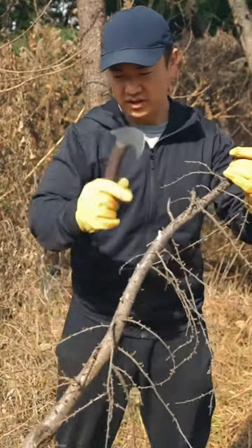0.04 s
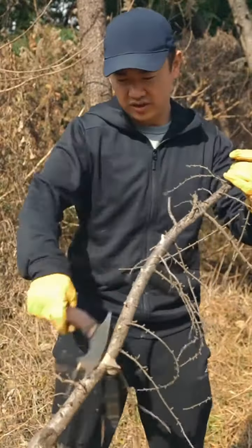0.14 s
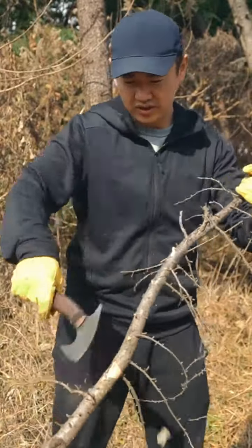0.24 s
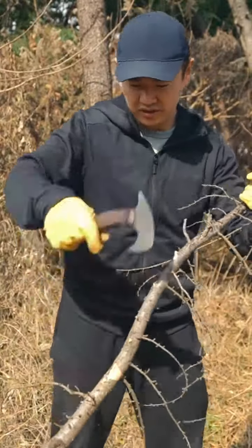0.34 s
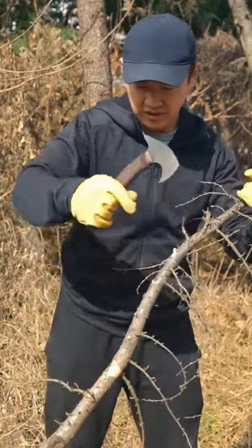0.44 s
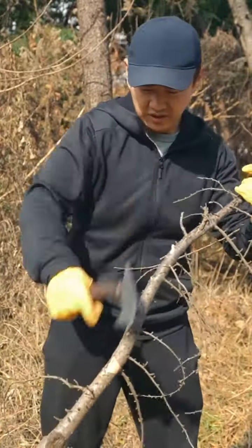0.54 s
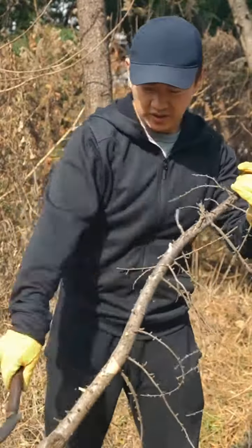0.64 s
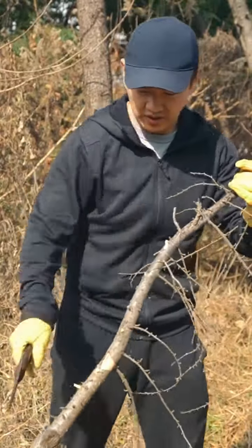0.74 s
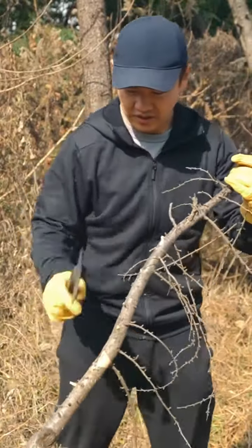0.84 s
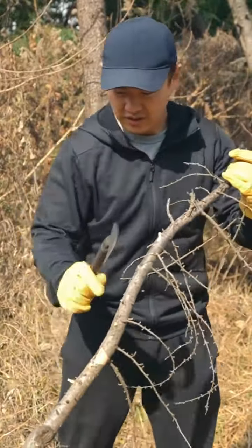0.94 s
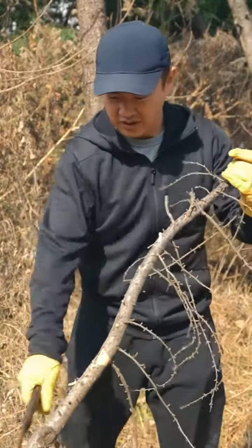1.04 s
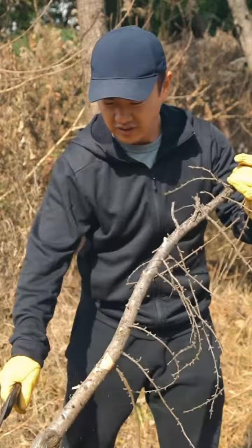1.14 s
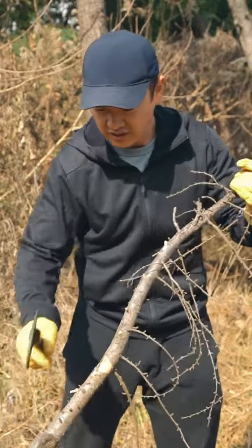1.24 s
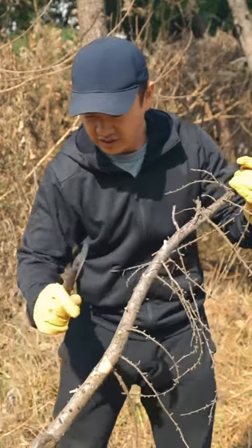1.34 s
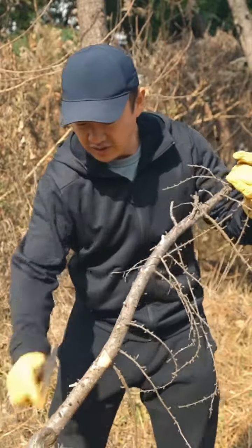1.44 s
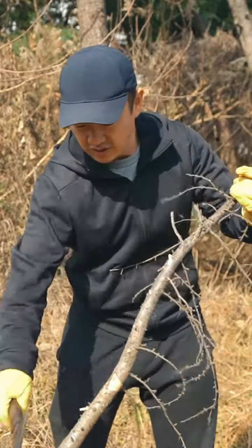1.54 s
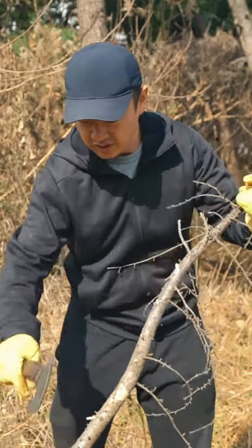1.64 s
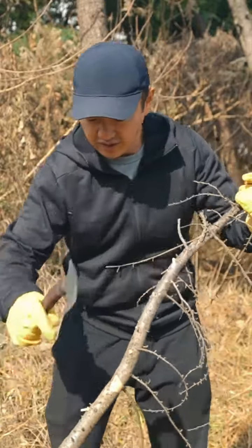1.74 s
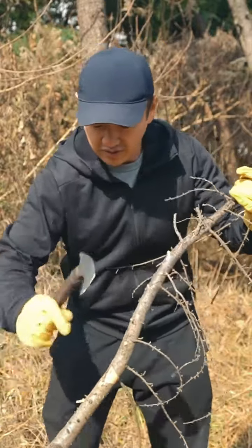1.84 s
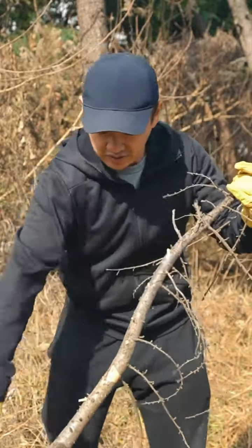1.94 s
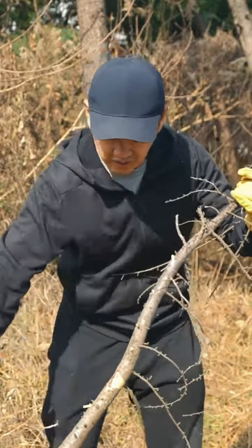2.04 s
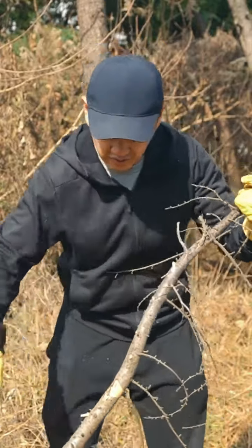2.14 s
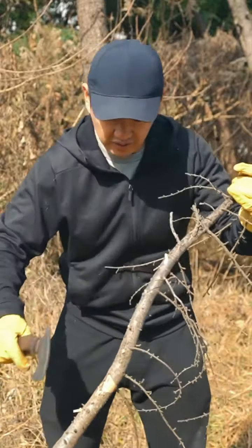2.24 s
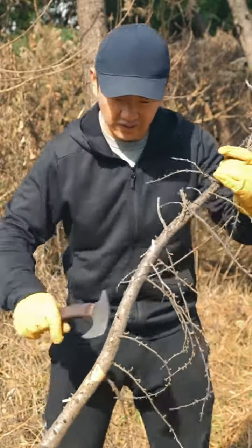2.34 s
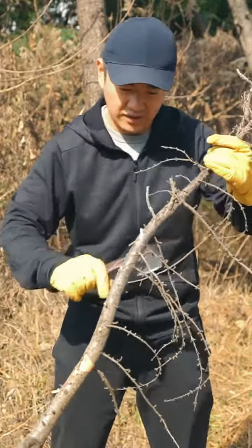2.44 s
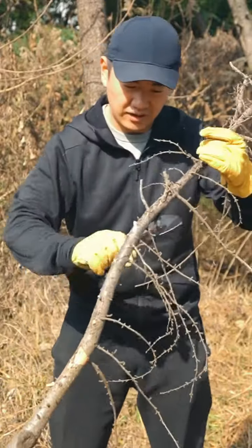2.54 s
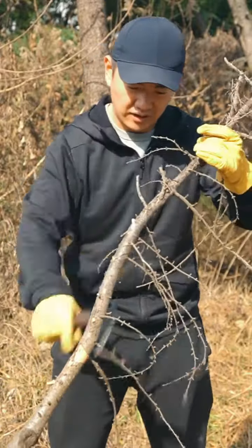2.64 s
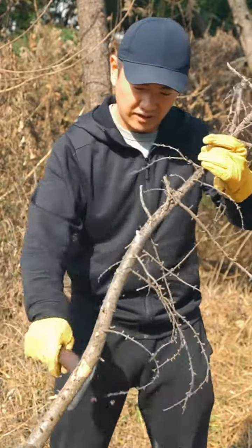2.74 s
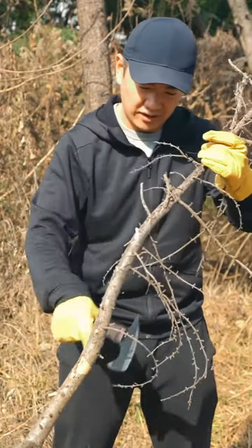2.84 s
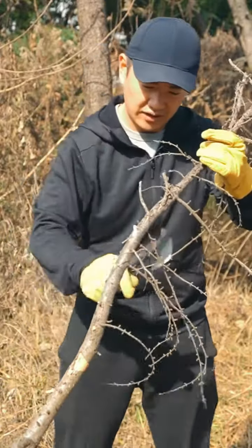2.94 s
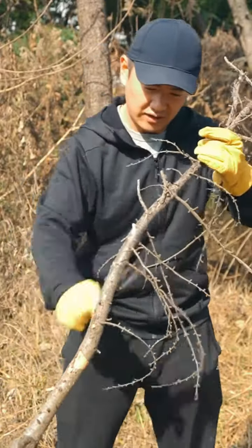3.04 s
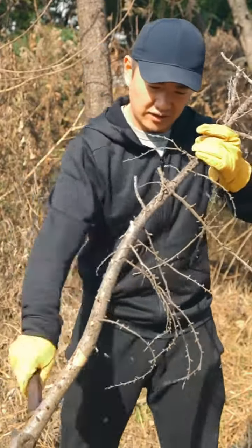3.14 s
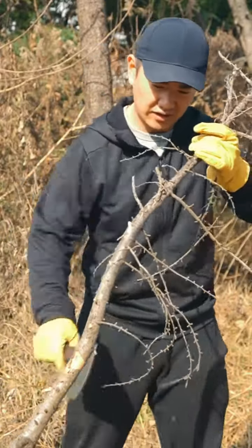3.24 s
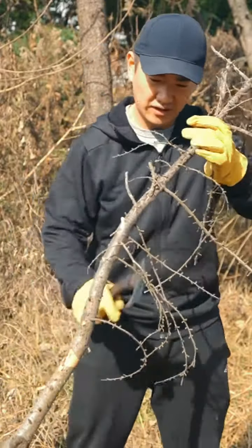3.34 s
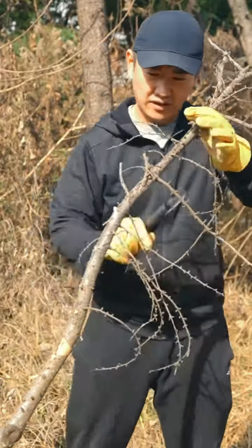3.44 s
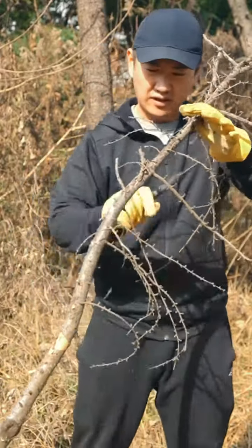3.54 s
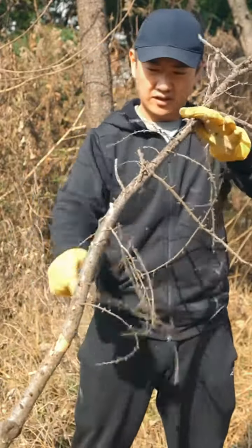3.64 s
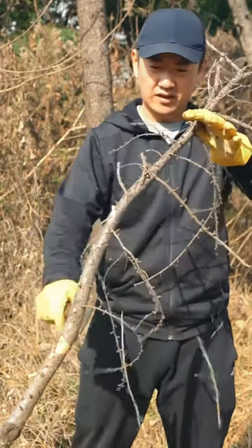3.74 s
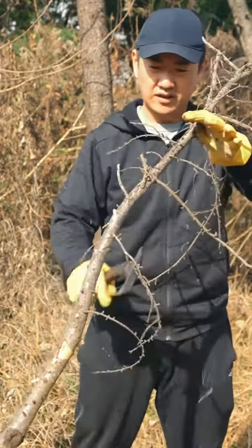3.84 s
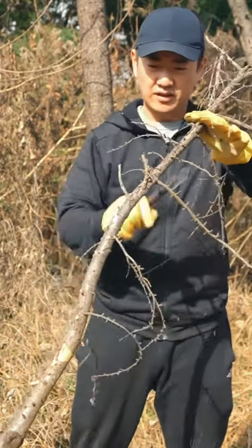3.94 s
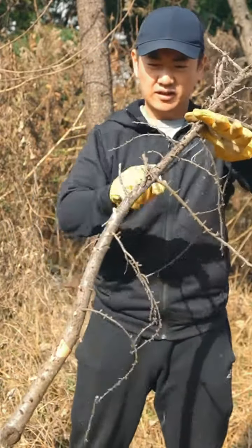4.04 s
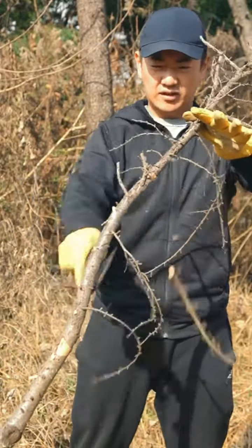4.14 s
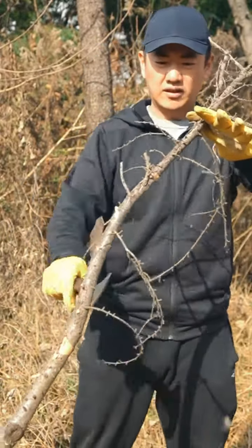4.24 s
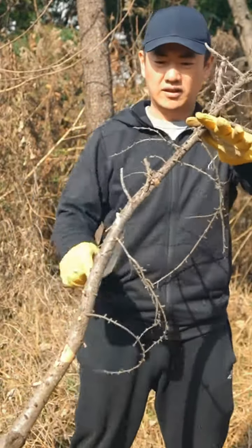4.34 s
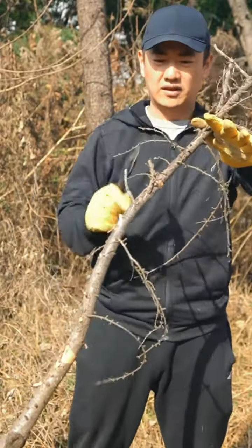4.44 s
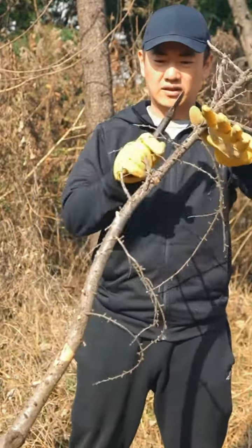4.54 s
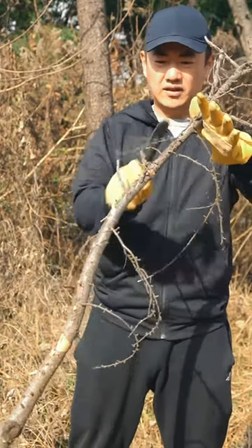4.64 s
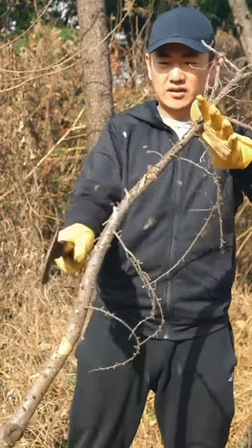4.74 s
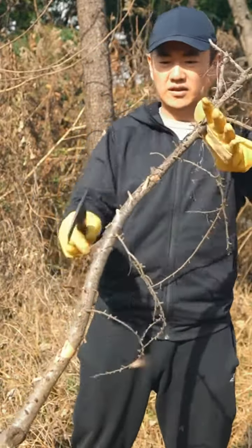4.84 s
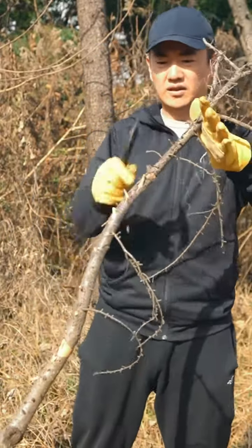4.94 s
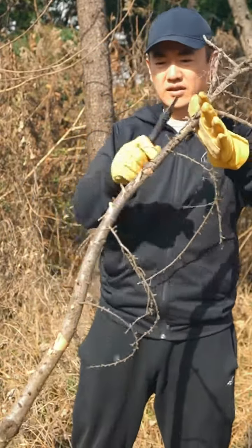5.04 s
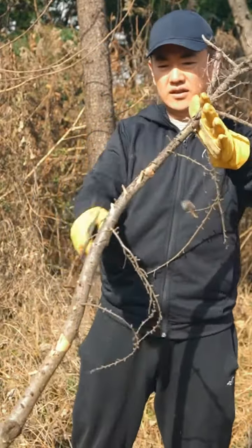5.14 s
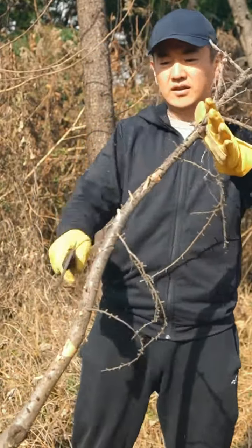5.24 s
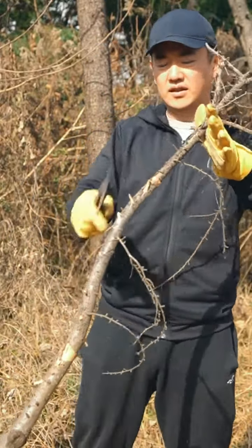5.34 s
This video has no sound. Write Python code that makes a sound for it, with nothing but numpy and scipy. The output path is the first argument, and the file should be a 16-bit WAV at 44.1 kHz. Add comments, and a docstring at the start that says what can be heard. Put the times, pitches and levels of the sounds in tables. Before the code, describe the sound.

A hand axe chops dry twigs off a branch with sharp, brittle cracks about twice a second, over a low outdoor rumble.

```python
"""Outdoors, close to the microphone, a hand axe strips dry twigs off a long branch in eleven strokes.
Each contact is a brittle fracture: the fibres fail as a burst of impulses that excites the modes of
the wood, while the impact rings the steel head. Twigs tick and swish between strokes, and ground and
trees scatter a short tail. Behind lie a far engine drone, a low rumble and distant traffic.
The loudest cracks saturate the microphone."""
import sys
import numpy as np
from scipy import signal
from scipy.fft import rfft, irfft, next_fast_len
from scipy.io import wavfile
from scipy.ndimage import uniform_filter1d

SR = 44100
rng = np.random.default_rng(int(sys.argv[2]) if len(sys.argv) > 2 else 0)


def dump(signal):
    """Clip the signal to [-1, 1] and save it as 16-bit WAV at the path in sys.argv[1]."""
    limited = np.clip(np.atleast_2d(signal).T, -1, 1)
    pcm = np.round(limited * 32767).astype(np.int16)
    wavfile.write(sys.argv[1], SR, pcm)


N = 238443
TIME, HIT_TIME = np.arange(N) / SR, np.arange(12000) / SR

# Clean breaks: t/s, levels/dB (knock, crack, splinters, steel), stem f/Hz, twig f/Hz, nominal T60/s
BREAKS = [(0.0753, -18.5, -15.5, -18, -19.5, 594, 3100, 0.021),
          (0.0824, -19, -11, -16, -30, 1150, 4760, 0.05), (0.0976, -20, -26, -19.5, -24, 940, 2450, 0.094),
          (0.1266, -26.5, -23.5, -28, -33, 735, 4570, 0.028),
          (0.5295, -12, -20, -29, -39, 1470, 2180, 0.015),
          (0.5337, -12.5, -19, -16.5, -23, 1360, 3620, 0.02),
          (0.972, -9.5, -13, -18.5, -40, 1124, 2860, 0.03),
          (1.4232, -12.5, -11, -12, -27, 1050, 4060, 0.018),
          (1.477, -16, -13.5, -12.5, -38, 1750, 3370, 0.0056),
          (1.875, -16.5, -14, -11.5, -23, 1240, 2010, .024), (2.613, -16, -17, -24, -24, 1380, 4620, 0.033),
          (3.028, -13, -22.5, -29, -47, 716, 3000, 0.037), (3.0338, -18.5, -26, -27, -32, 690, 3220, 0.027),
          (3.5824, -11.5, -14.5, -17, -20.5, 1220, 2260, 0.14),
          (4.0548, -12, -21, -15.5, -23.5, 1660, 2130, 0.026),
          (4.6235, -16.5, -18.5, -15, -45, 1280, 2370, 0.067),
          (4.632, -41, -17.5, -13, -23, 1330, 3350, 0.033), (4.71, -24, -20.5, -22, -30, 1380, 2200, 0.084),
          (5.0659, -17, -16, -16, -37, 1010, 2300, 0.043)]
# Twigs tearing off: t/s, knock level/dB, crack level/dB, stem f/Hz, twig f/Hz
TEARS = [(0.0936, -18, -24, 714, 3990), (0.11, -17.5, -28, 1280, 4050), (0.9829, -15.5, -21.5, 720, 2320),
         (1.4496, -16, -24, 1180, 2200), (1.469, -20, -16, 1410, 2250), (1.49, -25, -23, 1300, 4060),
         (1.8856, -21, -20, 1600, 2830), (1.893, -20, -20.5, 1160, 3930), (1.912, -32, -20, 1410, 3620),
         (2.6029, -13, -11.5, 1310, 2410), (2.618, -18.5, -27, 460, 2170), (2.6487, -26.5, -22, 1200, 4170),
         (3.0117, -23.5, -26.5, 800, 3150), (3.05, -20.5, -33, 607, 2240), (3.558, -16, -20, 680, 2136),
         (3.594, -12, -19.5, 870, 2960), (3.613, -18, -20, 567, 2180), (4.0675, -25, -26, 540, 3200),
         (4.0987, -15.5, -17, 1100, 2470), (4.613, -35, -16, 1790, 2900), (4.7395, -29, -25.5, 1730, 1978),
         (5.0836, -25, -34, 670, 3820)]
def axe():
    """Fracture: every contact knocks, cracks and rings the head; tearing twigs splinter more faintly."""
    out = np.zeros(N)
    for t, *blow in BREAKS:
        add(out, t, contact(*blow, sudden=0.91))
    for t, knock_db, crack_db, stem_hz, twig_hz in TEARS:
        splinter_db, steel_db = crack_db - 11.5, crack_db - 11
        tear = contact(knock_db, crack_db, splinter_db, steel_db, stem_hz, twig_hz, 0.079, sudden=0.74)
        add(out, t, tear)
    return out

def contact(knock_db, crack_db, splinter_db, steel_db, stem_hz, twig_hz, t60, sudden):
    """Superposition: four sounds start together, each with its own energy."""
    return (burst(knock(stem_hz, t60, sudden), knock_db)
            + burst(crack(twig_hz, t60, sudden), crack_db)
            + burst(splinters(t60, sudden), splinter_db)
            + burst(steel_ring(), steel_db))

# Force spectrum: f/centre frequency, relative level/dB
FORCE_SPECTRUM = [(.055, -51.5), (.16, -11), (.3, -7), (.6, 1), (1.1, -2), (1.8, -1), (3.2, -40.5),
                  (11, -62)]
# Branch modes: f/Hz, relative level/dB, T60/s
BRANCH_MODES = [(510, -12, 0.043), (529, 2.5, 0.11), (660, 18.5, 0.01), (872, 7, 0.07), (1030, 8, 0.023),
                (1326, -11.5, 0.023), (1270, 18, 0.029), (1606, 2, 0.12)]
def knock(stem_hz, t60, sudden):
    """Forced vibration: the blow drives branch and side stem; thicker wood knocks lower."""
    centre_hz = 1110 * (stem_hz / 1000) ** 0.47
    spectrum = [(ratio * centre_hz, db) for ratio, db in FORCE_SPECTRUM]
    force = colour(fracture(1.3 * t60, first=0.48 * sudden), spectrum)
    branch = ring(force, BRANCH_MODES, detune=0.0045)
    stem = resonate(force, stem_hz, q=10)
    return burst(force, 0) + burst(branch, -6) + burst(stem, -4)

# Crack spectrum: f/Hz, relative level/dB
CRACK_SPECTRUM = [(700, -33), (1500, 5.5), (2100, 2.5), (3000, 4.5), (4200, -0.5), (5500, -7), (8000, -54)]
def crack(twig_hz, t60, sudden):
    """Resonance: tearing fibres excite the twig at its natural frequency."""
    tear = colour(fracture(0.91 * t60, first=0.21 * sudden), CRACK_SPECTRUM)
    return burst(tear, 0) + burst(resonate(tear, twig_hz, q=10), -3)

# Splinter spectrum: f/Hz, relative level/dB
SPLINTER_SPECTRUM = [(3500, -20), (5300, 3), (6200, 6), (7600, 11.5), (9500, 6), (12000, 7), (15500, 5)]
def splinters(t60, sudden):
    """Acoustic emission: tiny fractures of very unequal size fill the treble."""
    fibres = fracture(0.83 * t60, first=0.55 * sudden, rate=6300, spread_db=7.5)
    return colour(fibres, SPLINTER_SPECTRUM)

# Axe head modes: f/Hz, relative level/dB, T60/s
STEEL_MODES = [(2770, 6, 0.075), (4050, -3.5, 0.066), (4780, 3, 0.096), (7220, 5.5, 0.079),
               (7400, -5, 0.082), (8000, 5, 0.039), (8700, -26, .045), (10960, 6.5, 0.035),
               (13200, -25, .04)]
def steel_ring():
    """Free vibration: the head is struck once, as the edge bites."""
    return ring(signal.unit_impulse(len(HIT_TIME)), STEEL_MODES, detune=0.006)

def fracture(t60, first, rate=7000, spread_db=-0.5):
    """Stress release: one impulse of weight `first`, then a dying run of failing fibres."""
    fibres = clicks(len(HIT_TIME), rate, spread_db) * fade(t60)
    fibres /= np.sqrt(np.sum(fibres ** 2))
    fibres[0] -= first
    return fibres

# Twig ticks: t/s, relative level/dB, f/Hz, ring level/dB re the snap
TICKS = [(0.034, -29.5, 7140, 0), (0.2147, -30.5, 4660, -11), (0.4753, -14.5, 3940, 28),
         (0.7778, -25, 2300, 0), (0.8763, -22, 3940, -1), (1.189, -23.5, 6200, -1),
         (1.2548, -21.5, 5300, -5), (1.814, -18, 4230, 1), (2.0246, -22, 3380, -3),
         (2.15, -13.5, 3830, -11), (2.288, -23, 5000, 2), (2.2938, -24, 5000, -8), (2.5744, -18.5, 2296, 3),
         (2.717, -21, 2014, 0), (2.812, -27, 2260, 9), (2.9104, -19, 14000, 2), (2.9934, -21, 3340, -3),
         (3.2236, -25, 4150, -3), (3.247, -23, 5100, -3), (3.6638, -18, 4700, 6), (3.685, -10.5, 3240, -8),
         (3.9632, -23.5, 13160, 3), (4.567, -28, 5320, 4), (4.6032, -11, 4750, 6), (4.78, -14, 9050, 9),
         (4.929, -22.5, 5070, -1), (5.059, -21, 7500, 4), (5.0894, -16, 7350, 0), (5.248, -23, 5330, 5)]
# Snap spectrum: f/Hz, relative level/dB
SNAP_SPECTRUM = [(800, -15), (2000, 0.5), (3500, 3.5), (5200, 1), (6500, -1), (9000, 2.5), (12000, 2),
                 (15500, -11)]
def twigs():
    """Damped resonance: each thin twig snaps and rings briefly at its own pitch."""
    out = np.zeros(N)
    for t, db, hz, ring_db in TICKS:
        snap = colour(fracture(t60=0.016, first=0.34), SNAP_SPECTRUM)
        tick = burst(snap, 0) + burst(resonate(snap, hz, q=5), ring_db)
        add(out, t, burst(tick, db - 12))
    return out

# Sweeps of twigs and sleeves: peak t/s, level/dB, release time constant/s
SWISHES = [(.31, -43.5, 0.11), (.91, -40, 0.023), (1.22, -41.5, 0.018), (1.5, -21, 0.025),
           (1.72, -39.5, 0.036), (2.02, -37.5, .08), (2.12, -38.5, 0.097), (2.39, -41.5, 0.046),
           (2.654, -26, .025), (2.77, -44, .06), (2.871, -43, .03), (2.91, -32.5, 0.035), (3.005, -32, .03),
           (3.24, -34, 0.032), (3.42, -50.5, 0.17), (3.71, -39, 0.14), (3.83, -36, 0.041),
           (3.939, -38.5, 0.079), (4.2, -44, 0.13), (4.346, -29, 0.067), (4.652, -29, 0.03),
           (4.796, -24.5, 0.062), (4.969, -36.5, 0.099), (5.24, -37.5, 0.052)]
def sliding_db():
    """Incoherent sources add in power: steady handling, swishes and a shiver after each break."""
    power = undb(-46.5 + 0.9 * walk(8.7)) ** 2
    for t, db, release_s in SWISHES:
        power += swell(t, db, release_s) ** 2
    for t, _, crack_db, *_ in BREAKS:
        power += swell(t + 0.066, crack_db - 26.5, release_s=0.04) ** 2
    return 10 * np.log10(power)

def swell(peak_s, db, release_s):
    """Exponential growth and decay; louder sweeps rise more abruptly."""
    attack_s = 0.041 * 2 ** np.clip(-(db + 35) / 6, -1, 1)
    return undb(db) * np.exp(-np.maximum((peak_s - TIME) / attack_s, (TIME - peak_s) / release_s))

# Friction spectrum: f/Hz, relative level/dB
FRICTION_SPECTRUM = [(500, -7), (1500, 9), (2500, 4.5), (3800, 4.5), (5200, 5), (6300, 0.5), (8300, 6.5),
                     (11000, 0), (13500, 7), (16000, -1.5)]
def brushing():
    """Friction noise: stems and cloth hiss and crackle, brighter as they slide more briskly."""
    level_db = sliding_db()
    crackle = sum(unit(resonate(clicks(N, rate=70, spread_db=5.5), hz, q=3))
                  for hz in np.geomspace(3500, 13000, 6))
    friction = colour(rng.standard_normal(N) + undb(-6) * unit(crackle), FRICTION_SPECTRUM)
    treble = signal.lfilter(*signal.butter(1, 5000, "high", fs=SR), friction)
    friction += treble * (undb(0.19 * (level_db + 30)) - 1)
    return unit(friction) * undb(level_db + 3 * walk(70))

def scatter(x, wet_db=-16, onset_s=0.0079):
    """Diffuse reflection: ground and trees return a thin, short tail."""
    onset = np.minimum(HIT_TIME / onset_s, 1) ** 2
    tail = rng.standard_normal(len(HIT_TIME)) * fade(t60=0.42) * onset
    tail = colour(tail, [(150, 9), (800, -2), (3000, 1.5), (8000, 3), (15000, 0)])
    return undb(wet_db) * signal.fftconvolve(x, tail / np.sqrt(np.sum(tail ** 2)))[:N]

# Grass spectrum: f/Hz, relative level/dB
GRASS_SPECTRUM = [(1000, 5), (2500, 4.5), (5200, 3.5), (6300, -25), (8300, -35), (11000, 1), (13500, -17),
                  (16000, -4.5)]
def grass():
    """Stationary noise: the dry grass never falls quite silent."""
    return noise(GRASS_SPECTRUM) * undb(-51)

# Engine firing rate: t/s, f/Hz
FIRING_RATE = [(0.0, 82), (0.04, 79.95), (0.98, 84.5), (1.32, 72.3), (1.57, 73.24), (1.99, 65.2),
               (2.15, 64.8), (3.74, 69.0), (4.23, 66.9), (4.34, 63.1), (4.83, 74), (5.41, 71.4)]
# Engine envelope: t/s, relative level/dB
ENGINE_LEVEL = [(0, -56), (.2, -46), (.33, -27.5), (.5, -45), (.65, -29.5), (1.0, -42), (1.35, -42.5),
                (1.93, -36.5), (2.1, -28.5), (2.41, -32), (2.52, -26), (2.7, -32.5), (2.88, -38),
                (3.05, -30), (3.33, -26.5), (3.46, -39), (3.79, -26.5), (3.9, -36), (4.04, -25.5),
                (4.36, -38), (4.7, -32), (5.1, -46), (5.3, -26.5), (5.41, -33)]
def engine():
    """Periodic excitation: a far engine sounds its wavering firing rate and the second harmonic."""
    hz = curve(FIRING_RATE) * (1 + 0.027 * walk(14))
    phase = 2 * np.pi * np.cumsum(hz) / SR
    tone = unit(np.sin(phase) + undb(-17) * np.sin(2 * phase))
    return tone * undb(curve(ENGINE_LEVEL) - 1 + 2.1 * walk(18))

# Rumble envelope: t/s, level/dB
RUMBLE_LEVEL = [(0, -23.5), (.38, -24.5), (.64, -30), (.78, -23.5), (1.35, -30), (2.56, -34.5), (3.0, -31),
                (3.45, -29), (4.05, -31.5), (4.56, -30), (5.1, -30.5), (5.35, -25)]
# Rumble spectrum: f/Hz, relative level/dB
RUMBLE_SPECTRUM = [(8, -2), (17, 10), (28, -4.5), (40, -1), (55, -9.5), (80, -5.5), (105, -17.5),
                   (135, -25.5), (250, -39)]
def rumble():
    """Amplitude modulation: low noise slowly swells and sinks."""
    return noise(RUMBLE_SPECTRUM + [(2000, -91)]) * undb(curve(RUMBLE_LEVEL))

# Traffic envelope: t/s, level/dB
TRAFFIC_LEVEL = [(0, -37.5), (2.4, -35), (3.9, -33.5), (4.6, -35), (5.41, -34.5)]
# Traffic spectrum: f/Hz, relative level/dB
TRAFFIC_SPECTRUM = [(59, -17.5), (100, -2), (141, -4), (182, -10), (232, -8), (433, -10.5), (492, -8.5),
                    (560, -7.5), (618, -7), (870, -6), (1260, -12), (1370, -14), (3000, -31), (3900, -76),
                    (6600, -120)]
def traffic():
    """Band-limited noise: distant traffic merges into a dull wash."""
    return noise(TRAFFIC_SPECTRUM) * undb(curve(TRAFFIC_LEVEL) + 0.88 * walk(9.1))

def ring(x, modes, detune):
    """Modal synthesis: x drives damped sinusoids that vary a little with grip and contact point."""
    response = 0
    for (hz, db, t60), (shift, weight) in zip(modes, rng.standard_normal((len(modes), 2))):
        mode = np.sin(2 * np.pi * hz * (1 + detune * shift) * HIT_TIME)
        response += undb(db + 1.6 * weight) * fade(t60) * mode
    return signal.fftconvolve(x, response)[:len(x)]

def resonate(x, hz, q):
    """Second-order resonance of quality factor q."""
    return signal.lfilter(*signal.iirpeak(hz, q, fs=SR), x)

def colour(x, spectrum):
    """Minimum-phase filtering: folding the cepstrum makes the response causal."""
    size = next_fast_len(len(x) + 2048)
    hz, db = np.transpose(spectrum)
    log_hz = np.log(np.maximum(np.arange(size // 2 + 1) * SR / size, 1))
    gain = undb(np.interp(log_hz, np.log(hz), db))
    cepstrum = irfft(np.log(gain), size)
    cepstrum[1:size // 2] *= 2
    cepstrum[size // 2 + 1:] = 0
    return irfft(rfft(x, size) * np.exp(rfft(cepstrum)), size)[:len(x)]

def noise(spectrum):
    """Filtered Gaussian noise of rms 1."""
    return unit(colour(rng.standard_normal(N), spectrum))

def clicks(size, rate, spread_db):
    """Shot noise: random impulses of unequal size, on average `rate` a second."""
    occurs = rng.random(size) < rate / SR
    sign = rng.choice([-1, 1], size)
    return unit(occurs * sign * undb(spread_db * np.minimum(rng.exponential(size=size), 4)))

def walk(rate):
    """Smoothed random steps, `rate` a second, with a spread near 1."""
    k = int(SR / rate)
    steps = np.repeat(rng.standard_normal(N // k + 1), k)
    return 1.3 * uniform_filter1d(uniform_filter1d(steps, k), k)[:N]

def fade(t60):
    """Exponential decay by 60 dB in t60 seconds."""
    return np.exp(-np.log(1000) * HIT_TIME / t60)

def burst(x, db):
    """Equal energy: scale x to match 10 ms at this level."""
    return x * undb(db) * np.sqrt(SR / 100 / np.sum(x ** 2))

def unit(x):
    """Normalisation to rms 1."""
    return x / np.sqrt(np.mean(x ** 2))

def undb(db):
    """Level to amplitude ratio."""
    return 10 ** (np.asarray(db) / 20)

def curve(rows):
    """Linear interpolation in time."""
    return np.interp(TIME, *np.transpose(rows))

def add(out, t, x):
    """Superpose x on out from time t."""
    i = int(t * SR)
    out[i:i + len(x)] += x[:N - i]

def scene():
    """Superposition of the axe work, its reflections and the background."""
    work = axe() + twigs()
    return (work + scatter(work) + brushing() + grass() + engine() + rumble() + traffic())[None]

def record(dry, ceiling=0.97, top_hz=15500):
    """Saturation: the microphone flattens the sharpest peaks; a low-pass cuts the top."""
    rounded = dry / (1 + np.abs(dry / ceiling) ** 8) ** (1 / 8)
    return signal.sosfilt(signal.ellip(12, .2, 85, top_hz, fs=SR, output="sos"), rounded)

dry = scene()
out = record(dry)
dump(out)
```